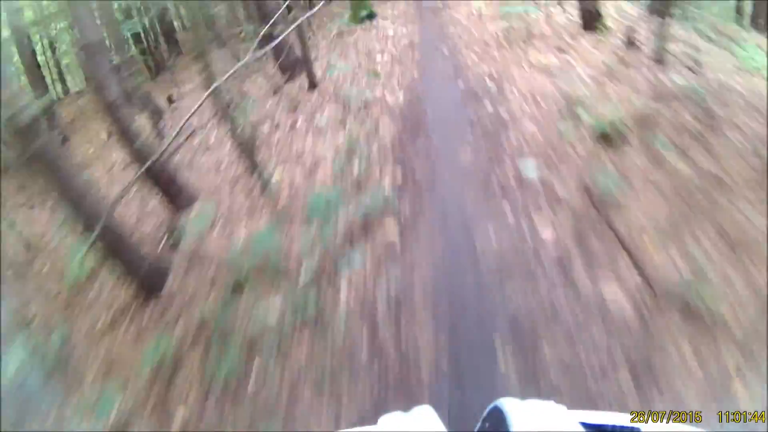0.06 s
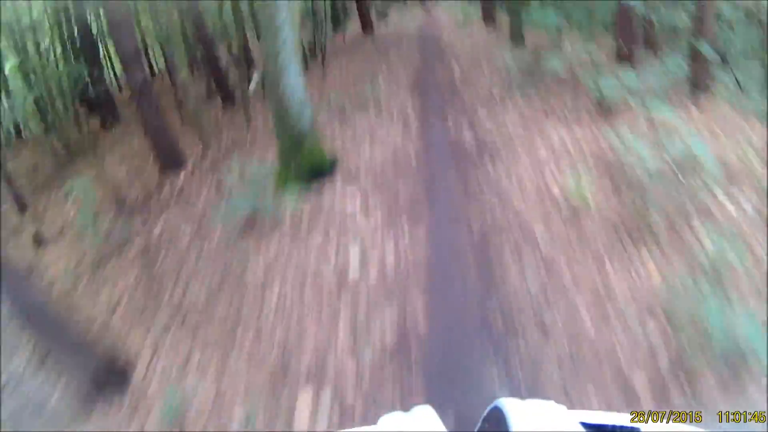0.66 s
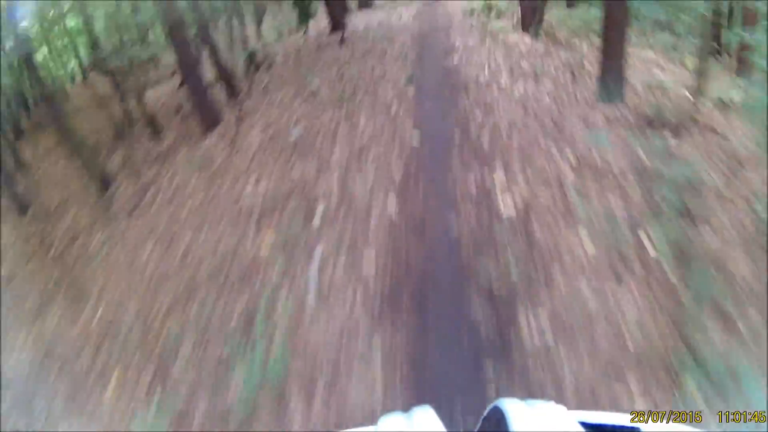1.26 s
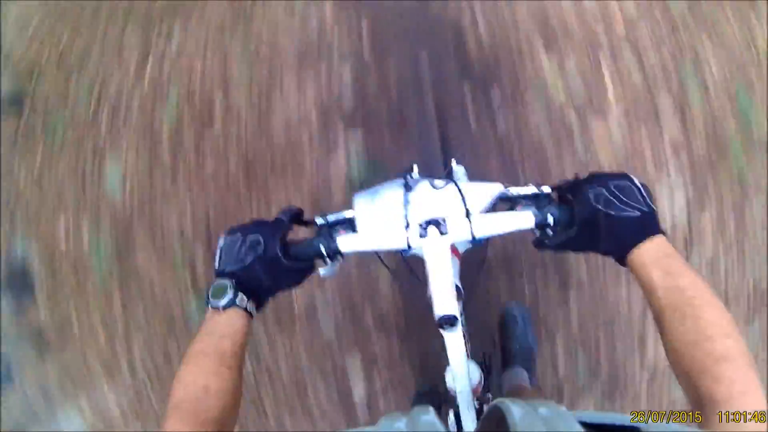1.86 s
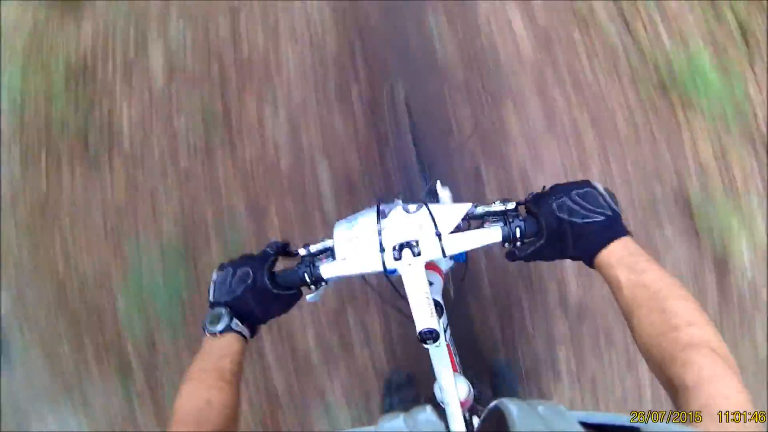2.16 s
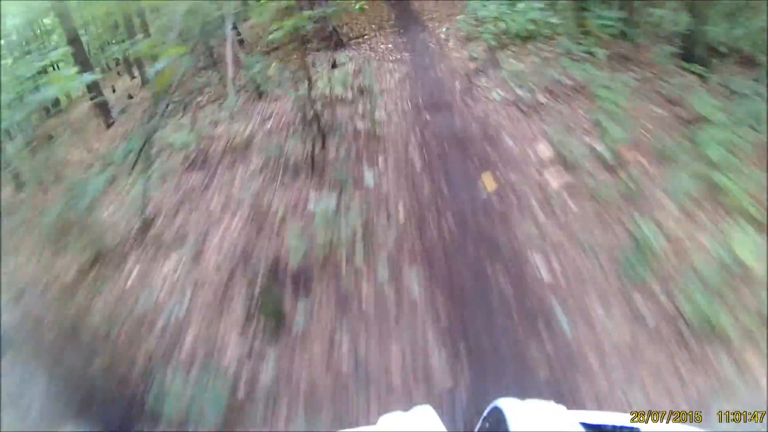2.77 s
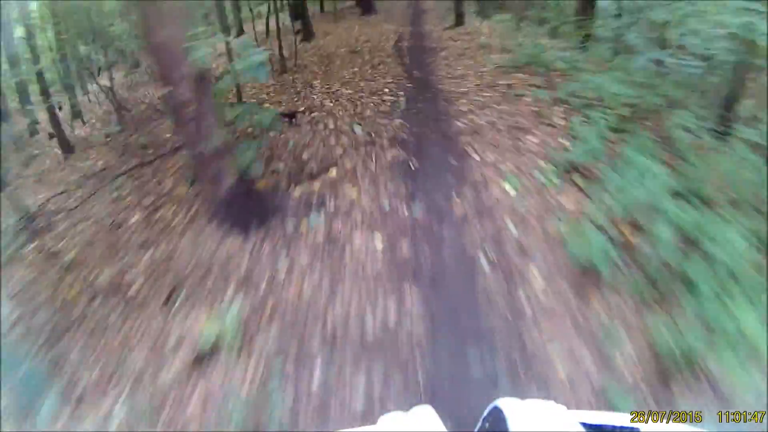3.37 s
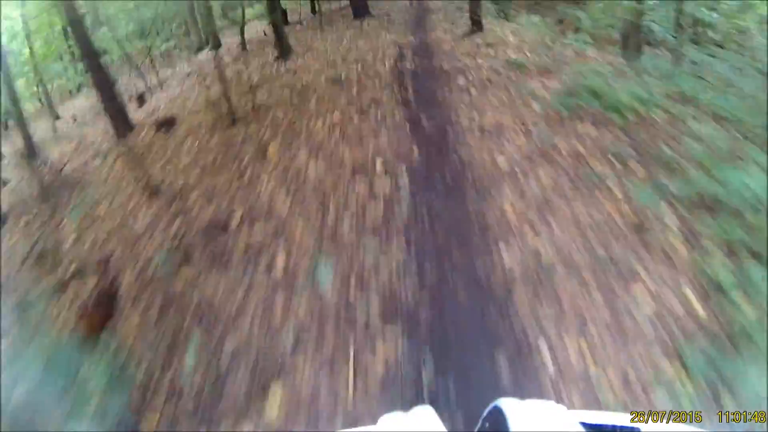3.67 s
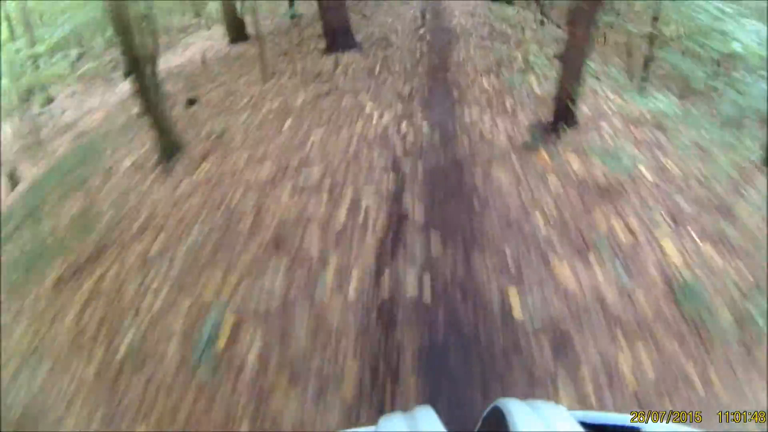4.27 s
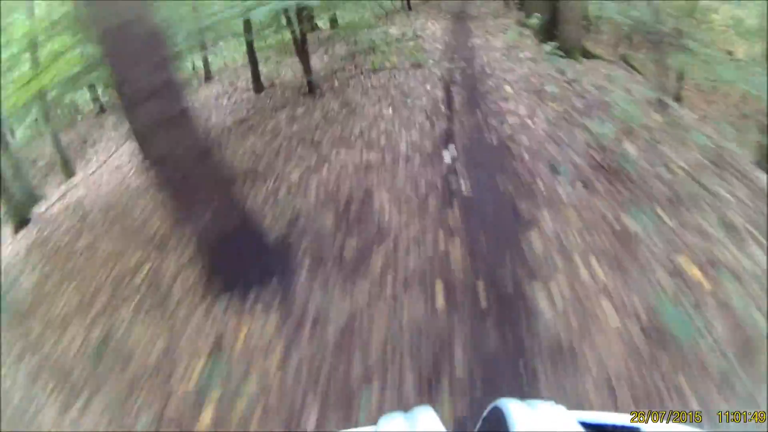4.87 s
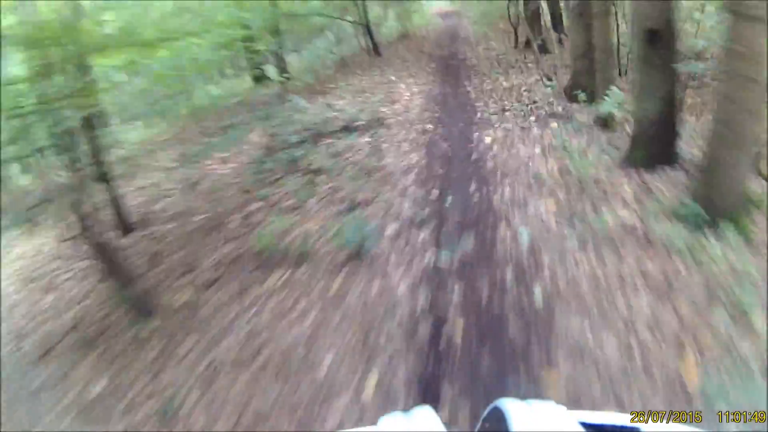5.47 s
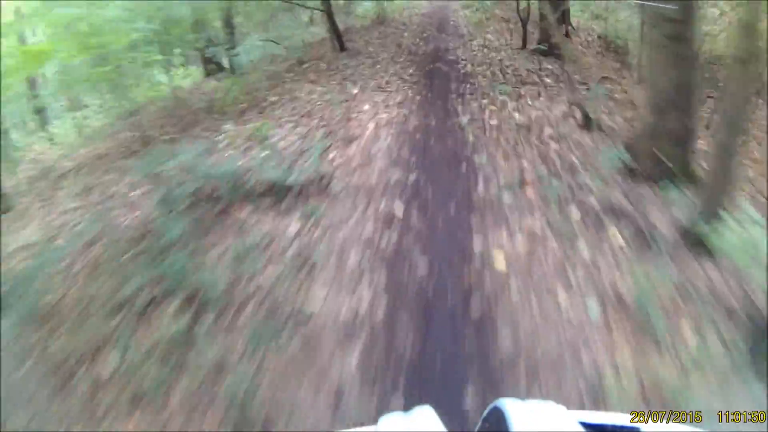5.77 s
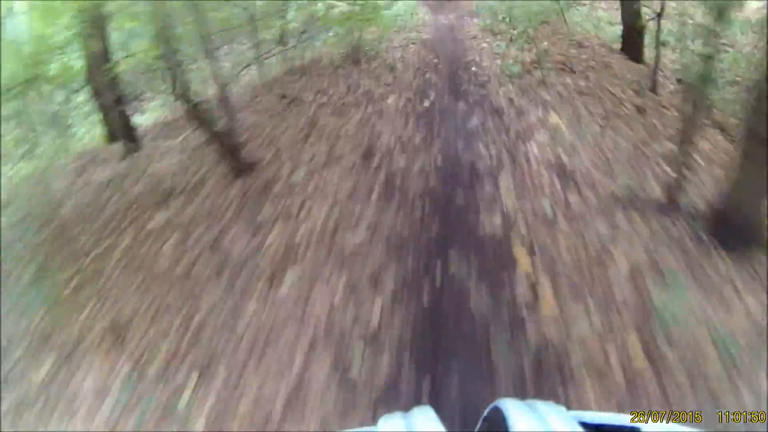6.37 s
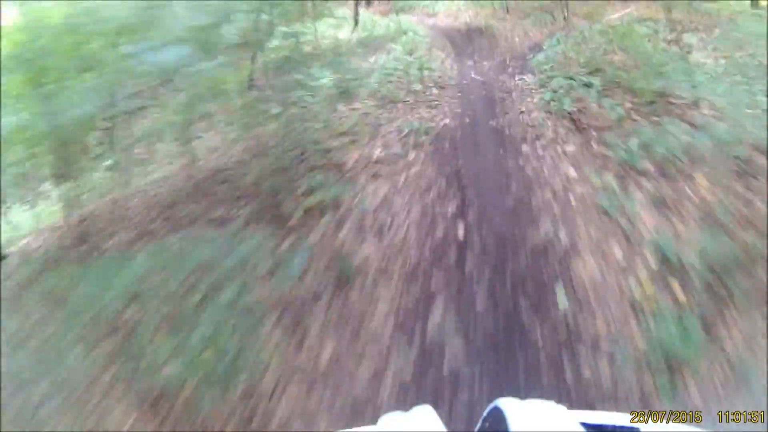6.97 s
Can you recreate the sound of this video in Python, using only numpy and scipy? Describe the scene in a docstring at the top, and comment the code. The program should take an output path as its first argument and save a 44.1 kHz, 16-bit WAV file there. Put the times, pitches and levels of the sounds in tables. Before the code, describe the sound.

Mountain bike tyres crunch fast over leaves and grit throughout, close and boxy, heard from a cased camera on the rider with no echo. Wind buffets the case in an uneven low rumble, and the shaken bike adds a dull boom. Small knocks, clacks and thumps dot the first second, followed by a sharp knock at 1.2 seconds and a duller one at 1.6. The crunch softens from about 1.7 to 2.4 seconds, then returns with a short rattle. Another sharp knock lands at 2.9, and a stronger rattle with a thump at 3.5. From about 4.5 to 5.5 seconds comes the roughest stretch, a quick run of low thumps, knocks and rattles. A clear knock follows at 5.9, and a lighter knock and rattle near 6.8. A faint steady hiss and a very thin, high electronic whine lie beneath everything.

```python
"""Mountain bike tyres crunch fast down a leafy dirt trail, heard from a camera in a closed case on the rider.
The crunch is a dense train of tiny impacts that excites resonances of the bike and the case. Rough ground
and blows set off short rattles, the camera mount knocks, a loose part clacks and bumps thump.
Wind buffets the case into a rumble and the shaken frame booms. Beneath it all lie the camera's own
hiss and thin whine."""
import sys
import numpy as np
from scipy import signal
from scipy.fft import rfft, irfft
from scipy.io import wavfile
from scipy.ndimage import uniform_filter1d

SR = 44100
rng = np.random.default_rng(int(sys.argv[2]) if len(sys.argv) > 2 else 0)


def bounce(signal):
    """Save signal as a 16-bit WAV file at the path given by the first command-line argument."""
    frames = np.transpose(np.atleast_2d(signal))
    limited = np.clip(frames, -1, 1)
    pcm = np.round(limited * 32767).astype(np.int16)
    wavfile.write(sys.argv[1], SR, pcm)


N = 313992

# spectrum of crushed leaves and grit: (frequency [Hz], relative density [dB])
CRUNCH_SPECTRUM = [(200, -9.5), (420, -11), (630, -14), (740, -4.5), (1000, -5.5), (1120, -6), (1380, 1.5),
                   (1560, -1), (1830, -6), (2000, -15), (2170, -13.5), (2400, -23.5), (2850, -20),
                   (3550, -29.5), (7000, -39)]
# resonances of the rolling bike: (frequency [Hz], bandwidth [Hz], gain [dB])
BIKE_RESONANCES = [(546, 53, 8), (850, 36.5, 7.5), (3910, 220, 5.5)]
# rough patches: (centre time [s], duration [s], relative rattle level [dB], boom level [dB])
ROUGH_PATCHES = [(0.238, .05, -46.5, -48), (0.754, .06, -44, -50), (1.673, 0.19, -59.5, -44.5),
                 (2.43, 0.11, -42.5, -41), (2.563, 0.038, -42, -52), (3.3, 0.045, -41.5, -52),
                 (3.462, 0.033, -33, -41), (3.536, 0.052, -34, -45.5), (4.561, 0.038, -46, -39),
                 (4.789, 0.036, -37.5, -42.5), (5.15, 0.031, -38.5, -46), (5.218, 0.026, -36, -37.5),
                 (5.348, 0.044, -44.5, -44.5), (6.782, 0.11, -47.5, -46)]
# modes of the camera mount: (frequency [Hz], relative level [dB], time to decay by 60 dB [s])
MOUNT_MODES = [(250, -19.5, 0.055), (533, -21.5, 0.04), (752, -12.5, 0.018), (973, -5, 0.022),
               (1146, 1, 0.0097), (1398, 3, 0.015), (1555, 0.5, 0.018), (1800, -9, 0.017),
               (2180, -16.5, 0.011), (2640, -14, 0.016), (2938, -16.5, 0.015), (3190, -21.5, 0.03),
               (4060, -22, 0.012), (4370, -23.5, 0.011), (4730, -23.5, 0.0089), (5410, -26.5, 0.012),
               (5940, -29.5, 0.0081), (7120, -27.5, 0.0043)]
# blows on the mount: (time [s], relative level [dB], low-pass cutoff [Hz])
MOUNT_KNOCKS = [(0.1482, -23.5, 750), (1.1668, -15.5, 6500), (1.5807, -41, 3000), (1.6037, -19.5, 1100),
                (1.778, -34, 6000), (2.2644, -32, 10000), (2.9118, -14.5, 7000), (3.025, -27.5, 2200),
                (3.465, -26, 2400), (4.9657, -27.5, 1380), (5.155, -26.5, 1710), (5.1929, -27, 2600),
                (5.221, -22.5, 3800), (5.338, -30.5, 1800), (5.927, -19.5, 5070), (6.7151, -27, 2400)]
# modes of the loose part: (frequency [Hz], relative level [dB], time to decay by 60 dB [s])
LOOSE_PART_MODES = [(824, -0.5, 0.0073), (1380, 0, 0.023), (1542, -1, 0.029), (1760, -1, 0.027),
                    (2620, -8, 0.009), (3210, -6.5, 0.012), (4140, -18.5, 0.011), (4250, -16.5, 0.011),
                    (5140, -15.5, 0.013), (5740, -12, 0.0037)]
# blows on the loose part: (time [s], relative level [dB], low-pass cutoff [Hz])
LOOSE_PART_CLACKS = [(0.57, -32.5, 7100), (0.8189, -30, 8230), (3.7692, -35, 1400), (4.4128, -33, 5030),
                     (4.69, -37, 9000), (5.107, -38.5, 6000), (5.5334, -34, 4500), (5.545, -29.5, 9000)]
# pulses from bumps: (crest time [s], relative peak level [dB], width at half height [s])
BUMP_PULSES = [(.155, -28, 0.0032), (.287, -26, .009), (0.871, -23.5, 0.01), (1.179, -25.5, 0.0057),
               (3.083, -23, 0.014), (3.295, -30, 0.0068), (3.497, -21, 0.0071), (4.715, -24.5, 0.0081),
               (4.816, -21, 0.0089), (4.925, -26, 0.0078), (5.071, -24, 0.012), (5.131, -20.5, 0.0068),
               (5.185, -24.5, 0.0079), (5.249, -18.5, 0.0086), (6.148, -31, 0.014), (6.31, -31.5, 0.013),
               (6.802, -29.5, 0.0068)]
# frame resonances excited by a bump: (frequency [Hz], bandwidth [Hz], gain [dB])
FRAME_RESONANCES = [(118.3, 18, 10.5), (260, 56, 11.5)]
# spectrum of wind on the case: (frequency [Hz], relative density [dB])
WIND_SPECTRUM = [(8, -6.5), (22, 1), (40, -8.5), (60, -12.5), (85, -20.5), (130, -28.5), (300, -46)]
# envelope of the gusts: (time [s], relative level [dB])
GUST_ENVELOPE = [(0.0, -41.5), (0.71, -49.5), (0.85, -41.5), (1.53, -53.5), (1.59, -41), (1.82, -50.5),
                 (3.47, -42), (4.1, -46), (4.24, -42), (4.48, -50.5), (4.66, -42.5), (5.27, -39.5),
                 (5.29, -42), (6.07, -56), (6.11, -45), (6.5, -52), (7.04, -40), (7.12, -48)]
# spectrum of the shaken frame: (frequency [Hz], relative density [dB])
BOOM_SPECTRUM = [(45, -16), (75, -7.5), (110, 1.5), (135, -2), (165, -12), (205, -13.5), (250, -11.5),
                 (310, -18.5), (420, -25), (800, -29.5)]
# spectrum of the camera's hiss: (frequency [Hz], relative density [dB])
HISS_SPECTRUM = [(1000, 5.5), (4500, 2), (7500, 1.5), (10000, 1.5), (12000, 0.5), (13800, 1), (15800, 3.5)]
# swells in the top of the hiss: (time [s])
SWELL_TIMES = [.23, .46, .8, 1.14, 5.37, 5.76, 6.09, 6.43, 6.79, 7.07]
# partials of the electronic whine: (frequency [Hz], level [dB])
WHINE_PARTIALS = [(15364, -87), (15423, -85), (15477, -75.5), (15536, -94), (15595, -97)]

ROLLING_DB, BOOM_DB = -45.5, -50.5
GROUND_SWING_DB, GROUND_DRIFT_HZ = 0.71, 12.8  # the ground varies under the tyres
# the rider looks down at the handlebar, and the tyres fade while the camera is turned
LOOK_DOWN_S, LOOK_UP_S, TURN_S, TURNED_LOSS_DB = 1.72, 2.44, 0.43, 6
SHAKE_DELAY_S, SHAKE_S = 0.0094, 0.032  # the brief rattle after each blow
REBOUND_S, CHATTER_S, CHATTER_DB = 0.0043, 0.0014, 3.5
BUFFET_DB, BUFFET_HZ = 1.54, 7.1  # uneven buffeting about each gust
CUTOFF_HZ = 15800


def tyres():
    """Shot noise: knobs crush leaves and grit, and grains on a rush excite the bike and the case."""
    turned = ramp(LOOK_DOWN_S, TURN_S) - ramp(LOOK_UP_S, TURN_S)
    crush = rng.standard_normal(N) + from_db(-4.5) * grains(per_s=900, spread_db=3.0)
    crunch = coloured(crush, CRUNCH_SPECTRUM)
    rings = sum(from_db(db) * resonance(crunch, hz, width) for hz, width, db in BIKE_RESONANCES)
    level_db = ROLLING_DB + GROUND_SWING_DB * drift(GROUND_DRIFT_HZ) - TURNED_LOSS_DB * turned
    return from_db(level_db) * rms_one(crunch + rings)


def rattles():
    """Random impact excitation: rough ground and blows set off bursts of soft contacts in the mount."""
    ground = sum(from_db(db) * hump(s, length) for s, length, db, _ in ROUGH_PATCHES)
    shakes = sum(hump(s + SHAKE_DELAY_S, SHAKE_S) for s, _, _ in MOUNT_KNOCKS + LOOSE_PART_CLACKS)
    contacts = grains(per_s=2200, spread_db=3.0) * np.hypot(ground, from_db(-44) * shakes)
    ring = signal.lfilter(*signal.butter(1, 1200, fs=SR), ringing(MOUNT_MODES, scatter_db=2.5))
    return from_db(-1.0) * signal.fftconvolve(contacts, ring / np.linalg.norm(ring))[:N]


def blows(rows, modes, rebound_db, scatter_db):
    """Convolution: a contact force drives a part's modes, once at the blow and once at a weaker rebound."""
    out = np.zeros(N + SR)
    for s, db, bright_hz in rows:
        for delay, level_db in ((0, db), (REBOUND_S, db + rebound_db)):
            ring = signal.fftconvolve(contact_force(bright_hz), ringing(modes, scatter_db))
            at = int((s + delay) * SR)
            out[at:at + len(ring)] += from_db(level_db) * ring
    return out[:N]


def contact_force(bright_hz):
    """Contact compliance acts as a low-pass: the softer the contact, the duller its push and chatter."""
    t = np.arange(SR // 50) / SR
    push = signal.lfilter(*signal.butter(1, 3300, fs=SR), t == 0)
    chatter = rng.standard_normal(len(t)) * np.sqrt(t) * np.exp(-t / CHATTER_S)
    chatter = signal.lfilter(*signal.butter(1, 2800, "high", fs=SR), chatter / np.linalg.norm(chatter))
    force = push + from_db(CHATTER_DB) * chatter
    return signal.lfilter(*signal.butter(2, min(bright_hz, SR / 3), fs=SR), force)


def ringing(modes, scatter_db):
    """Modal superposition: the impulse response of a struck part is a sum of damped sinusoids."""
    hz, db, t60 = np.transpose(modes)[:, :, None]
    t = np.arange(SR // 10) / SR
    strength = from_db(db + scatter_db * rng.standard_normal(db.shape))
    waves = strength * np.exp(-np.log(1000) * t / t60) * np.sin(2 * np.pi * hz * t)
    # neighbouring modes start in antiphase, so the ring takes a moment to build
    return waves[::2].sum(axis=0) - waves[1::2].sum(axis=0)


def thumps():
    """Transient response: a bump jolts the case with one pointed pulse and rings the frame's resonances."""
    t = seconds()
    pushes = sum(from_db(db) / (1 + (2 * (t - s) / width) ** 2) for s, db, width in BUMP_PULSES)
    jolts = signal.lfilter(*signal.butter(1, 16, "high", fs=SR), pushes)  # each push swings back slowly
    booms = sum(from_db(db) * resonance(jolts, hz, width) for hz, width, db in FRAME_RESONANCES)
    return from_db(0.5) * (jolts + booms)


def wind():
    """Turbulent pressure: wind buffets the case with a low noise whose level follows the gusts."""
    gust_db = np.interp(seconds(), *np.transpose(GUST_ENVELOPE))
    rumble = evened(coloured(rng.standard_normal(N), WIND_SPECTRUM), span_s=0.085)
    return from_db(gust_db + BUFFET_DB * drift(BUFFET_HZ) + 2.0) * rumble


def frame_boom():
    """Forced vibration: the ground shakes the frame into a low boom, louder over rough patches."""
    shaking = sum(from_db(db) * hump(s, length) for s, length, _, db in ROUGH_PATCHES)
    boom = evened(coloured(rng.standard_normal(N), BOOM_SPECTRUM), span_s=0.0705)
    return np.hypot(from_db(BOOM_DB), shaking) * boom


def camera_hiss():
    """Self-noise: the camera adds a steady broadband hiss whose top swells at times and ticks faintly."""
    hiss = from_db(-62.5) * coloured(rng.standard_normal(N), HISS_SPECTRUM)
    top_band = signal.butter(2, [12300, 14800], "band", fs=SR, output="sos")
    top = rms_one(signal.sosfilt(top_band, rng.standard_normal(N)))
    swells = from_db(-68.5) * top * sum(hump(s, 0.063) for s in SWELL_TIMES)
    ticks = resonance(grains(per_s=35, spread_db=2.0), hz=9800, width_hz=2000)
    return hiss + swells + from_db(-78) * rms_one(ticks)


def camera_whine():
    """Amplitude modulation: a cluster of high electronic tones wavers at random."""
    t = seconds()
    whine = sum(from_db(db) * np.sqrt(2) * np.sin(2 * np.pi * (hz * t + rng.random()))
                for hz, db in WHINE_PARTIALS)
    waver = rms_one(resonance(rng.standard_normal(N), hz=30, width_hz=15))
    return whine * (1 + 0.37 * waver)


def grains(per_s, spread_db):
    """A Poisson process: clicks at random moments, many small and a few large; rms 1."""
    sizes = from_db(spread_db * np.minimum(rng.exponential(1, N), 4))
    signs = rng.choice([-1, 1], N)
    return rms_one(sizes * signs * (rng.random(N) < per_s / SR))


def resonance(x, hz, width_hz):
    """A damped resonator: two poles, with unit gain at the peak."""
    r = np.exp(-np.pi * width_hz / SR)
    feedback = [1, -2 * r * np.cos(2 * np.pi * hz / SR), r * r]
    return signal.lfilter(np.array([1, 0, -1]) * (1 - r * r) / 2, feedback, x)


def coloured(x, spectrum):
    """Spectral shaping, with a roll-off an octave beyond each end of the spectrum; rms 1."""
    hz, db = np.transpose(spectrum)
    bins = np.maximum(np.fft.rfftfreq(N, 1 / SR), 1)
    gain = from_db(np.interp(np.log(bins), np.log(hz), db))
    edges = 1 / np.sqrt((1 + (hz[0] / 2 / bins) ** 4) * (1 + (bins / hz[-1] / 2) ** 4))
    return rms_one(irfft(rfft(x) * gain * edges, N))


def evened(x, span_s):
    """Envelope flattening: division by the running rms removes the slow swings of a noise."""
    return x / np.sqrt(uniform_filter1d(x ** 2, max(int(span_s * SR), 2)) + 1e-9)


def drift(cutoff_hz):
    """Low-pass noise: a slow random swing; rms 1."""
    return rms_one(signal.sosfilt(signal.butter(2, cutoff_hz, fs=SR, output="sos"), rng.standard_normal(N)))


def hump(middle_s, width_s):
    """A Gaussian envelope of height 1, given by its width at half height."""
    return np.exp2(-np.minimum(np.square(2 * (seconds() - middle_s) / width_s), 60))


def ramp(middle_s, length_s):
    """A linear transition from 0 to 1."""
    return np.clip((seconds() - middle_s) / length_s + .5, 0, 1)


def from_db(db):
    """The amplitude ratio of a level in decibels."""
    return 10 ** (np.asarray(db) / 20)


def rms_one(x):
    """Normalisation to rms 1."""
    return x / np.sqrt(np.mean(x ** 2) + 1e-20)


def seconds():
    """Uniform sampling: the time of every sample."""
    return np.arange(N) / SR


def scene():
    """Superposition: all sources add at one microphone in the case, with no echo from the forest."""
    knocks = blows(MOUNT_KNOCKS, MOUNT_MODES, rebound_db=-10.5, scatter_db=1.5)
    clacks = blows(LOOSE_PART_CLACKS, LOOSE_PART_MODES, rebound_db=-7.5, scatter_db=2.0)
    ride = tyres() + rattles() + knocks + clacks + thumps() + wind() + frame_boom()
    return (ride + camera_hiss() + camera_whine())[None]


def record(dry):
    """Band limiting: a steep elliptic low-pass removes the highest treble."""
    return signal.sosfilt(signal.ellip(12, .1, 80, CUTOFF_HZ, fs=SR, output="sos"), dry)


dry = scene()
out = record(dry)
bounce(out)
```